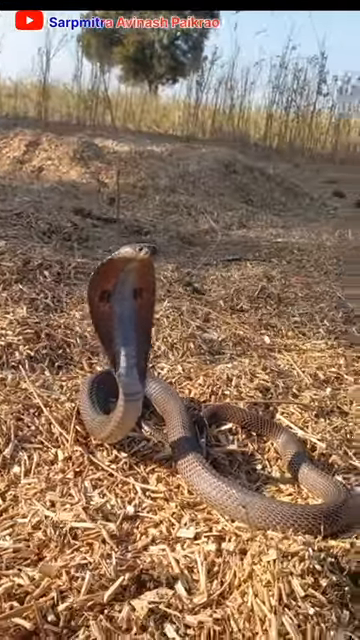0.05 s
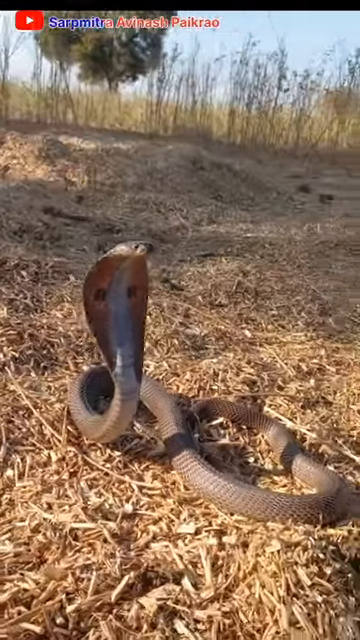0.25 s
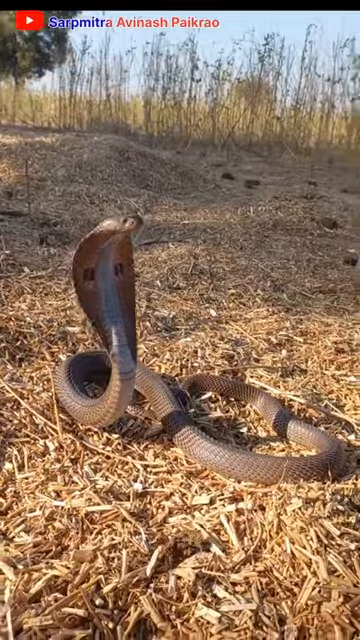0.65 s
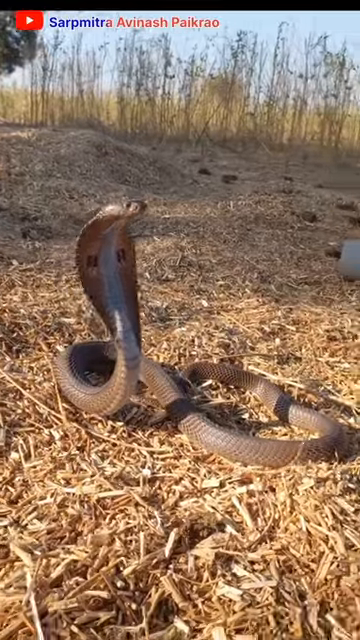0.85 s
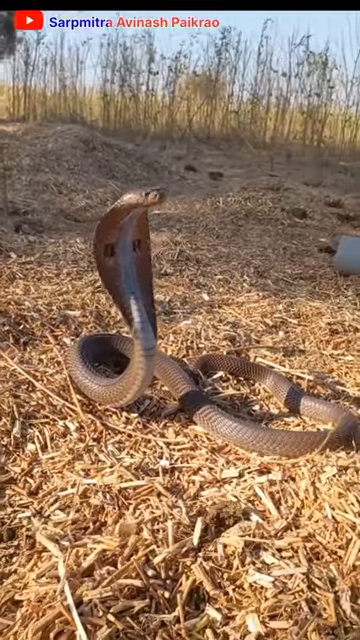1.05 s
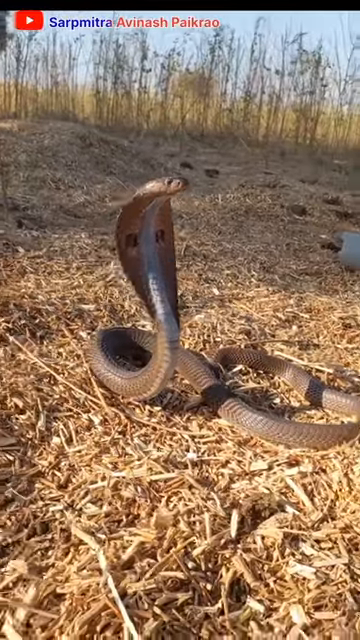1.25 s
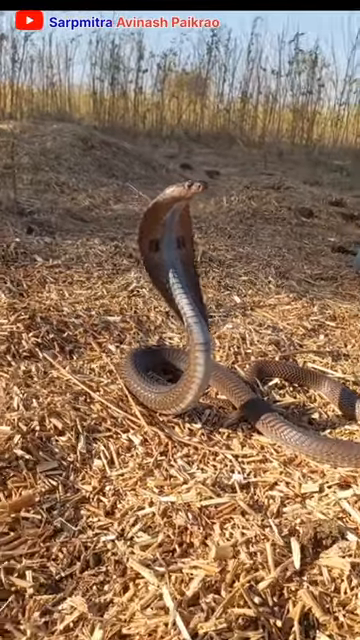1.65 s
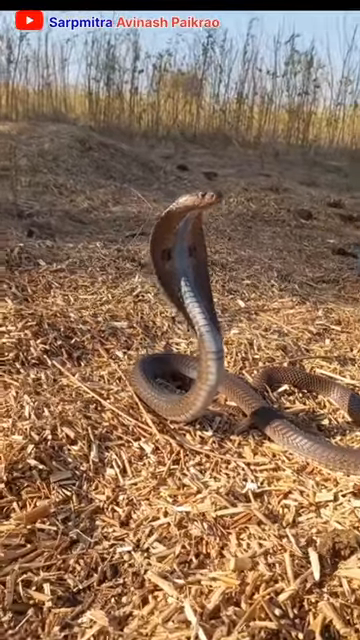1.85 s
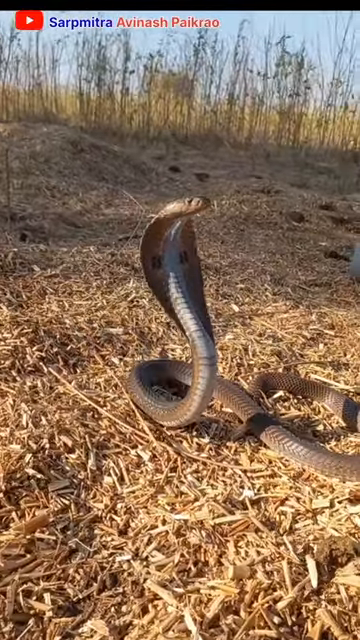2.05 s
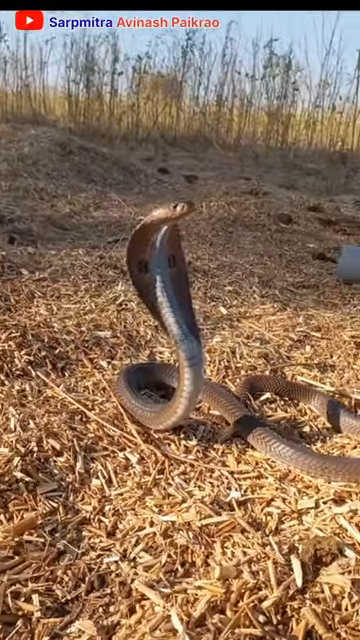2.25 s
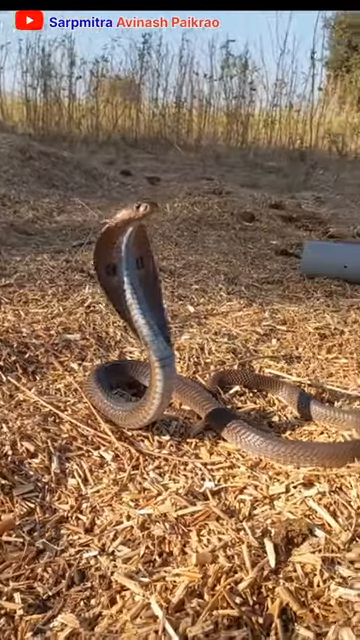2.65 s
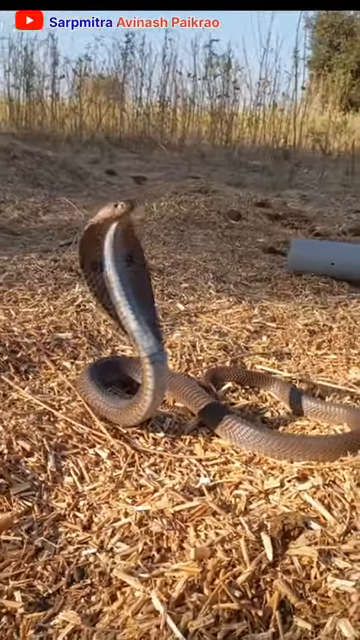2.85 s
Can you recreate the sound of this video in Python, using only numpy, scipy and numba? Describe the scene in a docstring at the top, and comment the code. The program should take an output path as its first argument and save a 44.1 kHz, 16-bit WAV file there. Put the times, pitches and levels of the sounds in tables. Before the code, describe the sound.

A snake hisses, thin then full, then falls silent as wind buffets the microphone.

```python
"""A thin hiss swells to a long full one, then stops: a rearing cobra on straw in an open field.
Air forced through its glottis makes a broad jet, a hollow low band and a sinking throat resonance.
Wind buffets the two microphone ports separately; nearby, dry stalks rub in rustles and snap in ticks.
The faint noise of the distant field lies underneath."""
import sys
import numpy as np
from scipy import signal
from scipy.fft import rfft, irfft
from scipy.io import wavfile
from scipy.ndimage import uniform_filter1d
from numba import njit

SR = 44100
rng = np.random.default_rng(int(sys.argv[2]) if len(sys.argv) > 2 else 0)


def int16_out(signal):
    """Quantize to a 16-bit WAV file."""
    q = np.round(np.clip(np.atleast_2d(signal).T, -1, 1) * 32767)
    wavfile.write(sys.argv[1], SR, q.astype(np.int16))


N = 132300  # 3 s

# jet strength (time [s], level [dB])
HISS_ENVELOPE = [(0, -55.5), (.25, -57.5), (.55, -54), (.66, -49.5), (1.0, -50.5), (1.45, -47.5),
                 (1.9, -47.5), (2.1, -49.5), (2.17, -55), (2.25, -75), (2.4, -102)]
# air jet (frequency [Hz], relative density [dB])
JET_SPECTRUM = [(150, -6.5), (600, 4), (1700, 5.5), (2100, 1), (5000, 3), (6300, 3.5), (8700, 1),
                (12000, 3.5), (15500, 3)]
# throat resonance, sinking as the air runs out (time [s], centre [Hz], level re jet [dB])
THROAT_TRACK = [(0, 1230, -18), (.09, 1163, -5.5), (.55, 1162, -8.5), (.9, 1066, -12), (1.55, 1040, -12.5),
                (1.85, 1080, -16.5), (2.0, 780, -15.5), (2.2, 740, -13)]
# hollow low band of a full hiss (frequency [Hz], relative density [dB])
BODY_SPECTRUM = [(80, -12), (200, -3), (380, 0), (500, -1), (610, -11.5), (850, -14), (1200, -26),
                 (3000, -44)]
THROAT_WIDTH_HZ, PORT_LAG_S = 177.0, 0.000163
BODY_DB, FULL_HISS_DB, BODY_DB_PER_DB = 2, -47.5, 0.5  # body re jet at full hiss; slope with effort
GROUND_LAG_S, GROUND_ECHO_DB, GROUND_CUTOFF_HZ = 0.001449, -10.5, 7000


def cobra(flutter_db=1.35, flutter_hz=20.5):
    """Air forced through the glottis rings the throat; the jet also bounces off the ground."""
    hz, effort_db = freqs(), curve(HISS_ENVELOPE)
    echo = undb(GROUND_ECHO_DB) * np.exp(-2j * np.pi * hz * GROUND_LAG_S)
    ground = 1 + echo / (1 + (hz / GROUND_CUTOFF_HZ) ** 2)
    port_lag = np.exp(-2j * np.pi * hz * PORT_LAG_S * np.arange(2)[:, None])  # left leads
    jet = shaped(noise_pair(correlation=0.53), colour(JET_SPECTRUM) * ground * port_lag)
    centre_hz = curve(THROAT_TRACK)
    throat = noise_pair(correlation=0.61)
    for _ in range(2):  # two stages for steeper skirts
        throat = np.array([bandpass(air, centre_hz, THROAT_WIDTH_HZ) for air in throat])
    throat = unit_rms(throat) * undb(curve(THROAT_TRACK, column=2))
    body_db = BODY_DB + BODY_DB_PER_DB * (effort_db - FULL_HISS_DB)
    body = shaped(noise_pair(correlation=0.96), colour(BODY_SPECTRUM)) * undb(body_db)
    return (jet + throat + body) * undb(effort_db + flutter_db * wander(flutter_hz))


# gusts (start [s], length [s], left level [dB], right level [dB], eddy boost [dB])
PORT_GUSTS = [(0.088, 0.021, -32.5, -56, -1), (0.189, 0.028, -50, -33.5, -13),
              (0.293, 0.024, -26.5, -41, 2.5), (0.377, 0.038, -61, -26.5, -9),
              (0.471, 0.11, -27.5, -29.5, -1), (0.577, 0.015, -28, -19.5, 4.5),
              (0.618, 0.054, -30.5, -26.5, 4.5), (0.75, 0.092, -35.5, -32, 3.5),
              (0.865, 0.063, -26.5, -18, 0.5), (0.938, 0.045, -37, -22, 9), (1.02, 0.038, -34, -24, -0.5),
              (1.149, 0.039, -34, -17.5, -14), (1.213, 0.055, -27, -23.5, -3.5),
              (1.699, 0.044, -33, -28, -9), (1.829, 0.012, -24.5, -30, 4), (1.866, 0.18, -37.5, -28, 1),
              (1.921, 0.032, -52, -20.5, -3), (2.23, 0.16, -51, -27, 6), (2.417, 0.098, -29, -28, -0.5),
              (2.5, 0.015, -18.5, -22.5, -4.5), (2.69, 0.037, -33.5, -31, -6)]
# breeze under the gusts (time [s], left level [dB], right level [dB])
BREEZE_ENVELOPE = [(0, -46.5, -44.5), (.8, -36, -32.5), (1.15, -31, -33.5), (1.42, -40.5, -38),
                   (1.6, -44.5, -34), (2.15, -36, -40.5), (2.55, -35.5, -41), (2.65, -42.5, -46.5),
                   (2.8, -41.5, -41.5), (3, -44.5, -54.5)]
# wind on a port (frequency [Hz], relative density [dB])
RUMBLE_SPECTRUM = [(22, -49), (35, -34.5), (50, -21.5), (80, 3.5), (115, 3.5), (170, -9.5), (250, -19),
                   (400, -32.5), (600, -53), (1500, -81.5)]
# small eddies (frequency [Hz], relative density [dB])
EDDY_SPECTRUM = [(60, -42), (150, 3), (230, 9), (330, -7.5), (490, -14), (650, -27.5), (900, -49.5),
                 (2000, -75)]
EDDY_DB, STRONG_GUST_DB, EDDY_DB_PER_DB = -7, -22.5, 0.53  # eddy gain in a strong gust; slope with force


def wind(flicker_db=3, flicker_hz=58):
    """Each port rumbles on its own; strong, sharp gusts add small eddies."""
    ports = []
    for port in range(2):
        power = eddy_power = undb(curve(BREEZE_ENVELOPE, column=port + 1)) ** 2
        for start_s, length_s, *port_db, boost_db in PORT_GUSTS:
            gust = undb(port_db[port]) * swell(start_s, length_s, attack_s=0.006, release_s=0.016)
            power = power + gust ** 2
            eddy_power = eddy_power + (gust * undb(boost_db)) ** 2
        force = np.sqrt(power)
        eddies = unit_rms(turbulence(EDDY_SPECTRUM) * undb(flicker_db * wander(flicker_hz)))
        eddies *= undb(EDDY_DB) * (force / undb(STRONG_GUST_DB)) ** EDDY_DB_PER_DB
        ports.append(force * turbulence(RUMBLE_SPECTRUM) + np.sqrt(eddy_power) * eddies)
    return np.array(ports)


def turbulence(spectrum, evenness=0.72, window_s=0.0297):
    """Random pressure swings, held to a fairly even strength."""
    pressure = shaped(rng.standard_normal(N), colour(spectrum))
    local_power = uniform_filter1d(pressure ** 2, int(window_s * SR))
    return unit_rms(pressure / local_power ** (evenness / 2))


# stalks rubbing (start [s], length [s], level [dB], right re left [dB], dull re bright [dB], attack [s])
STRAW_RUSTLES = [(0.077, 0.094, -67, -1, 11.5, 0.031), (0.613, 0.045, -53.5, 11, -7, .015),
                 (.73, 0.086, -56, 3, -2, 0.024), (2.585, 0.14, -58.5, 7.5, -13, 0.045),
                 (2.704, 0.12, -47.5, 6.5, -11.5, 0.067), (2.855, 0.082, -53.5, 3.5, -12.5, 0.029),
                 (2.95, .022, -42, 5.5, -8.5, 0.018)]
# stalks snapping (start [s], level [dB], right re left [dB], dull re bright [dB])
STRAW_TICKS = [(0.443, -52, 11, -18), (0.74, -53, 8, -15), (0.789, -51, 5, 2.5), (2.658, -52.5, 5, -20),
               (2.684, -45, 7, -16), (2.839, -46, 4, -16)]
# bright part of the crackle (frequency [Hz], relative density [dB])
BRIGHT_SPECTRUM = [(1000, -13), (2500, -15), (5500, -2), (9000, -4), (11000, 0.5), (13000, 6), (15500, 0)]
# dull part of the crackle (frequency [Hz], relative density [dB])
DULL_SPECTRUM = [(150, 8.5), (600, 6), (1100, 1.5), (2300, 6.5), (4300, 3.5), (15000, -23)]


def straw(grain_db=2.0, grain_hz=690):
    """Dry stalks rub in dense tiny crackles; now and then one snaps."""
    def crackle(spectrum):
        grains = noise_pair(correlation=0.23) * undb(grain_db * wander(grain_hz))
        return shaped(grains, colour(spectrum))

    bright, dull = crackle(BRIGHT_SPECTRUM), crackle(DULL_SPECTRUM)

    def stalks(level_db, right_db, dull_db):
        pan_db = np.array([[-right_db], [right_db]]) / 2
        return (bright + undb(dull_db) * dull) * undb(level_db + pan_db)

    mix = np.zeros((2, N))
    for start_s, length_s, *levels_db, attack_s in STRAW_RUSTLES:
        mix += stalks(*levels_db) * swell(start_s, length_s, attack_s, release_s=0.037)
    for start_s, *levels_db in STRAW_TICKS:
        mix += stalks(*levels_db) * swell(start_s, length_s=0.002, attack_s=0.0004, release_s=0.004)
    return mix


# distant field (frequency [Hz], relative density [dB])
FIELD_SPECTRUM = [(100, 22.5), (800, 4), (2000, 3.5), (4500, 2.5), (6500, 6.5), (9000, 1.5), (15000, 2)]


def field(level_db=-62.5):
    """Steady, diffuse noise of the distant field."""
    return undb(level_db) * shaped(noise_pair(correlation=0.1), colour(FIELD_SPECTRUM))


def undb(db):
    """Decibels to gain."""
    return 10 ** (np.asarray(db) / 20)


def curve(table, column=1):
    """One column of a time table, interpolated per sample."""
    rows = np.array(table)
    return np.interp(np.arange(N) / SR, rows[:, 0], rows[:, column])


def freqs():
    """FFT bin frequencies [Hz]."""
    return np.arange(N // 2 + 1) * SR / N


def colour(spectrum):
    """Gain per bin from (frequency [Hz], level [dB]) points."""
    hz, db = np.array(spectrum).T
    return undb(np.interp(np.log(freqs() + 1), np.log(hz), db))


def unit_rms(x):
    """Scale each channel to rms 1."""
    return x / np.sqrt(np.mean(x ** 2, axis=-1, keepdims=True))


def shaped(x, gain):
    """Filter by a gain per bin; rms 1."""
    return unit_rms(irfft(rfft(x) * gain, N))


def noise_pair(correlation):
    """White noise at both ports, partly shared."""
    noise = rng.standard_normal((3, N))
    return np.sqrt(correlation) * noise[0] + np.sqrt(1 - correlation) * noise[1:]


def wander(rate_hz):
    """Smooth random drift; rms 1."""
    return shaped(rng.standard_normal(N), np.exp(-(freqs() / rate_hz) ** 2))


def swell(start_s, length_s, attack_s, release_s):
    """Linear attack, hold until length_s, exponential release."""
    age_s = np.arange(N) / SR - start_s
    return np.clip(age_s / attack_s, 0, 1) * np.exp(-np.maximum(age_s - length_s, 0) / release_s)


@njit
def bandpass(x, centre_hz, width_hz):
    """State-variable band-pass with a moving centre."""
    y = np.empty(len(x))
    band_state = low_state = 0.0
    for i in range(len(x)):
        tuning = np.tan(np.pi * centre_hz[i] / SR)
        damping = width_hz / centre_hz[i]
        band = (band_state + tuning * (x[i] - low_state)) / (1 + tuning * (tuning + damping))
        band_state = 2 * band - band_state
        low_state += 2 * tuning * band
        y[i] = damping * band
    return y


def scene():
    """Snake, wind and straw over the quiet field."""
    return cobra() + wind() + straw() + field()


# microphone housing resonances (centre [Hz], width [Hz], gain [dB])
HOUSING_PEAKS = [(1510, 245, 4), (3634, 145, 4.5), (5700, 200, 0), (6070, 280, 3)]
LOWPASS_HZ = 15550


def record(dry):
    """The microphone housing colours the sound; a steep low-pass cuts the top."""
    housing_db = sum(db / (1 + (2 * (freqs() - centre_hz) / width_hz) ** 2)
                     for centre_hz, width_hz, db in HOUSING_PEAKS)
    coloured = irfft(rfft(dry) * undb(housing_db), N)
    lowpass = signal.ellip(10, 0.2, 80, LOWPASS_HZ, fs=SR, output="sos")
    return signal.sosfilt(lowpass, coloured)


dry = scene()
out = record(dry)
int16_out(out)
```